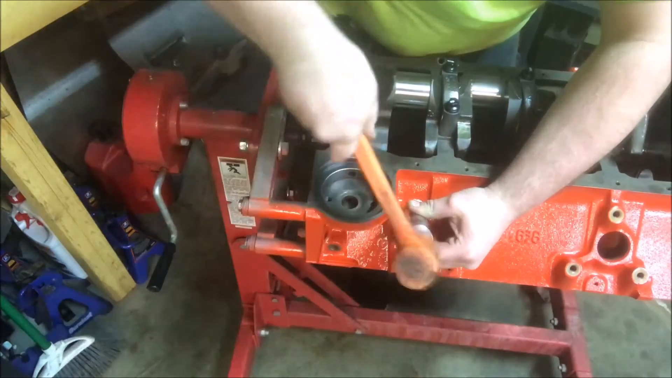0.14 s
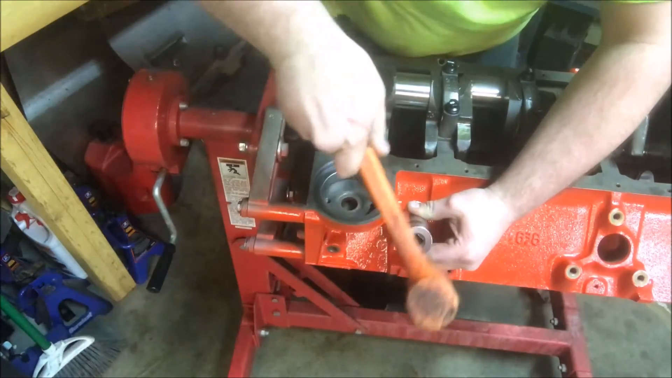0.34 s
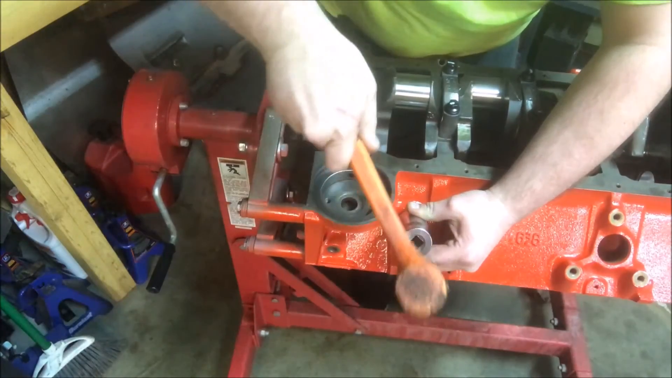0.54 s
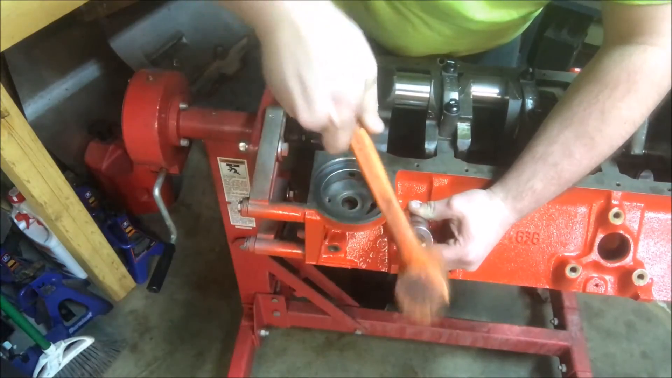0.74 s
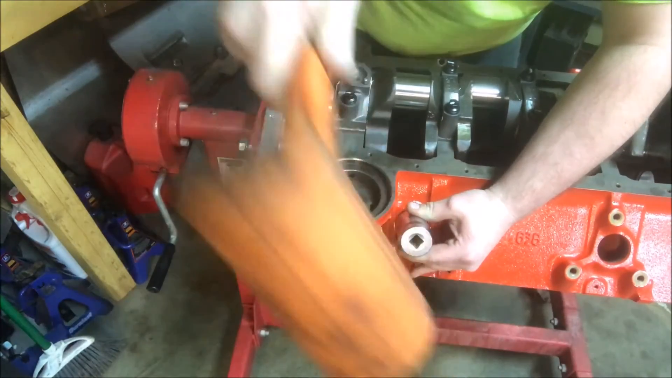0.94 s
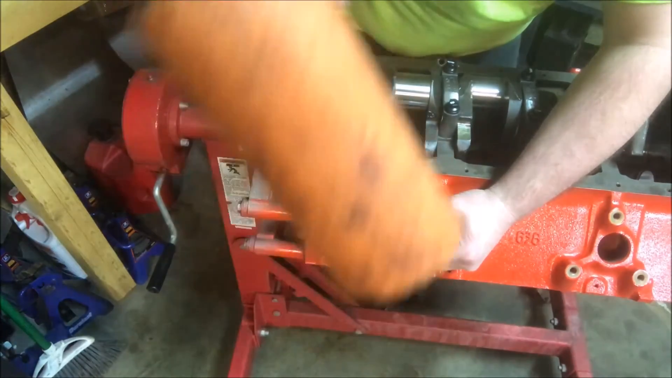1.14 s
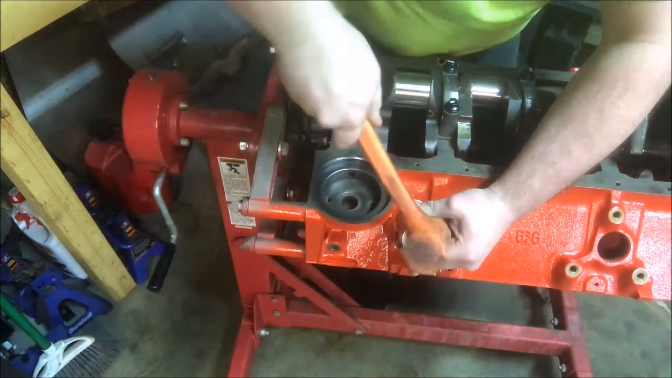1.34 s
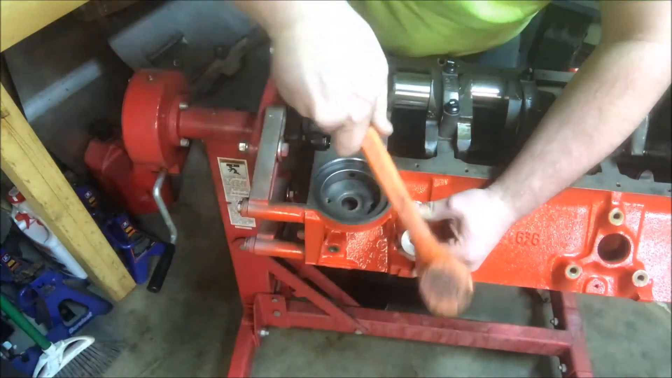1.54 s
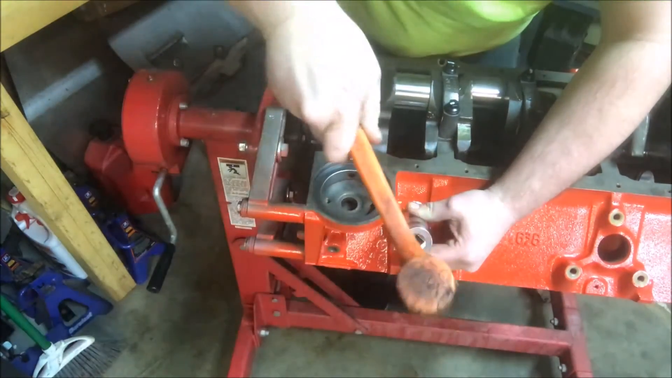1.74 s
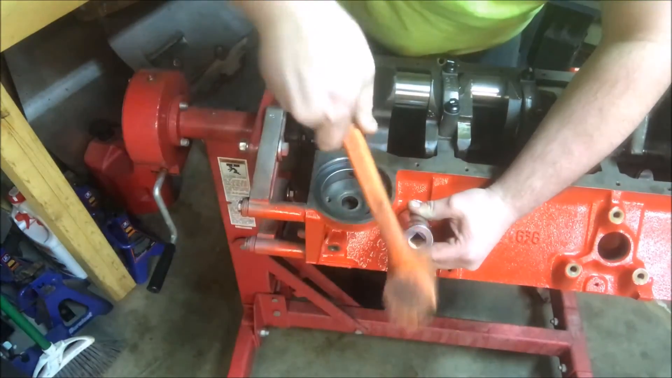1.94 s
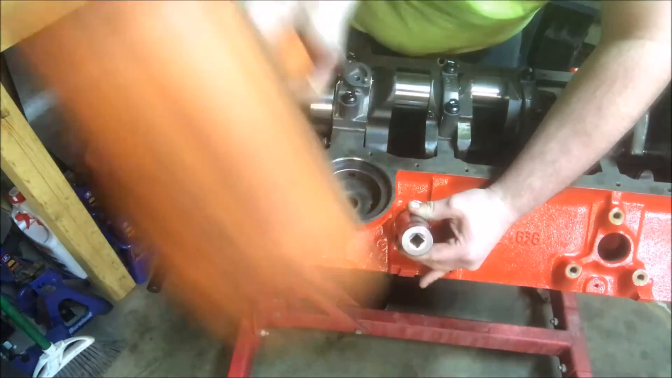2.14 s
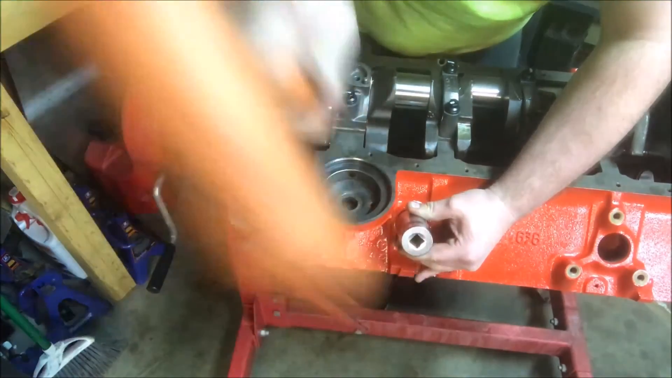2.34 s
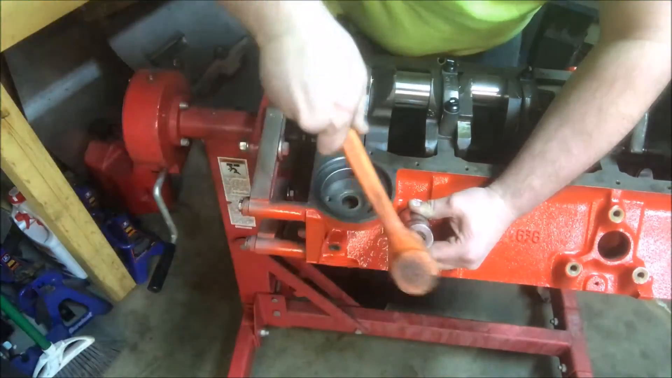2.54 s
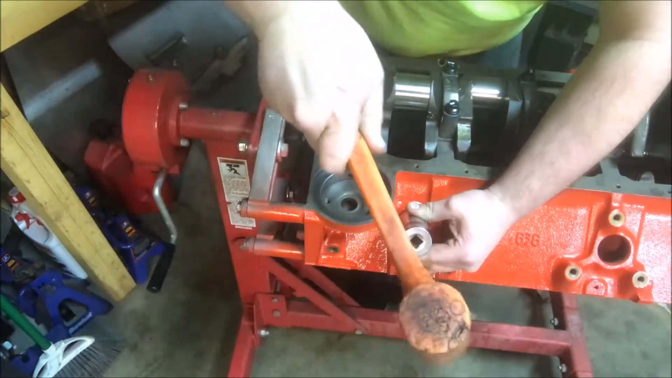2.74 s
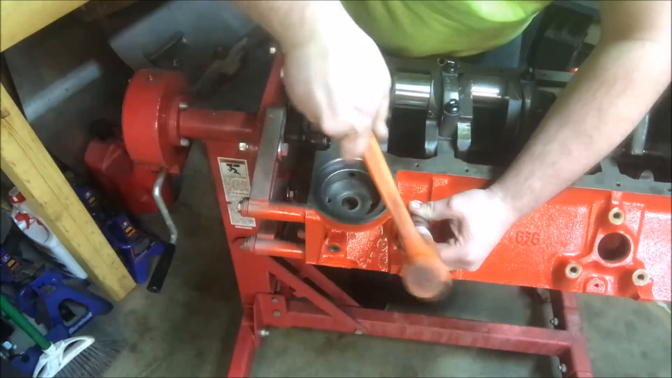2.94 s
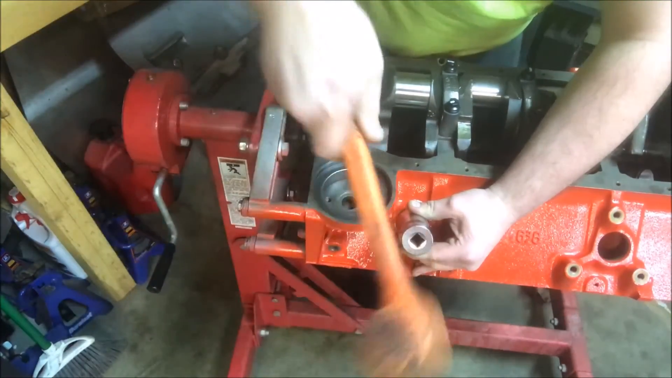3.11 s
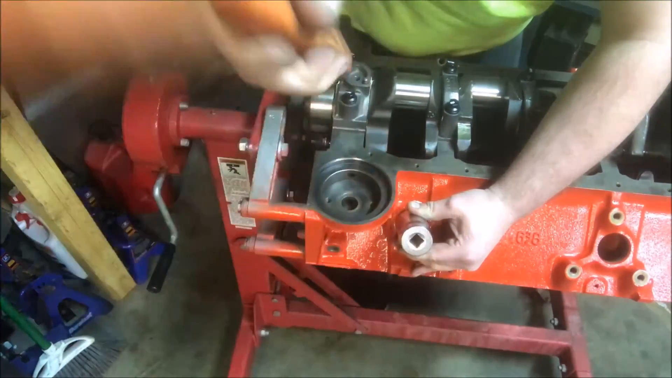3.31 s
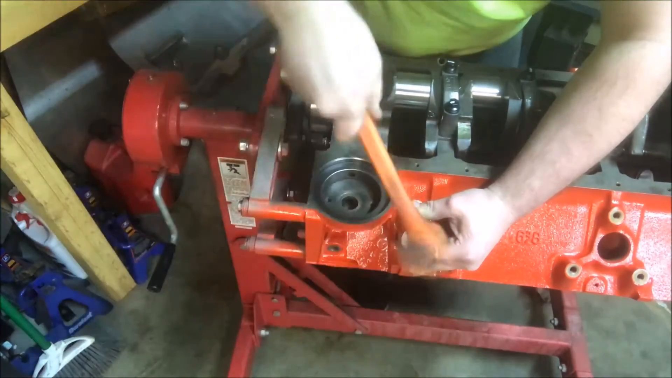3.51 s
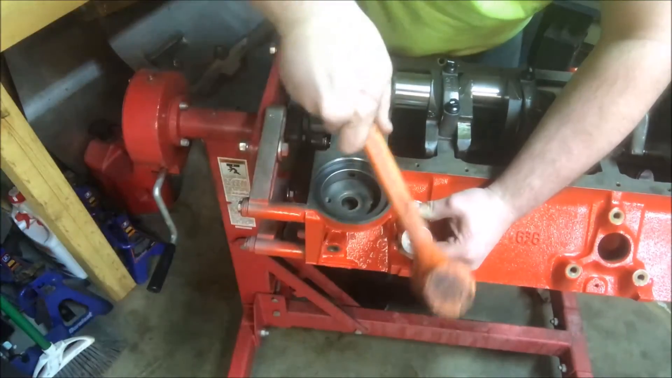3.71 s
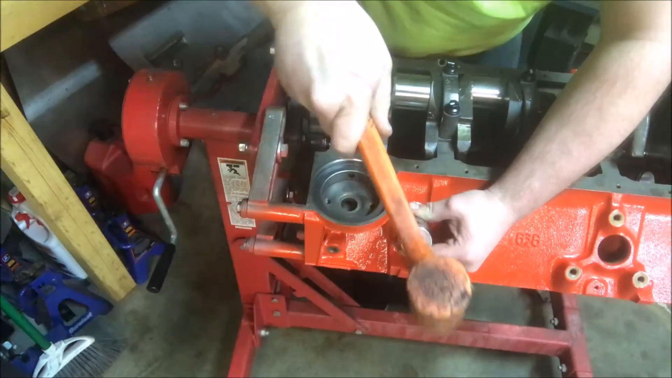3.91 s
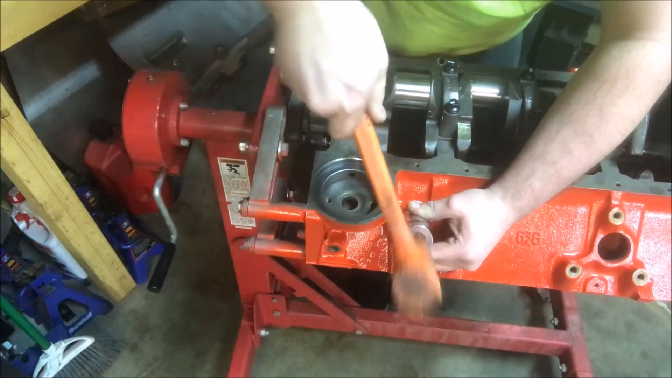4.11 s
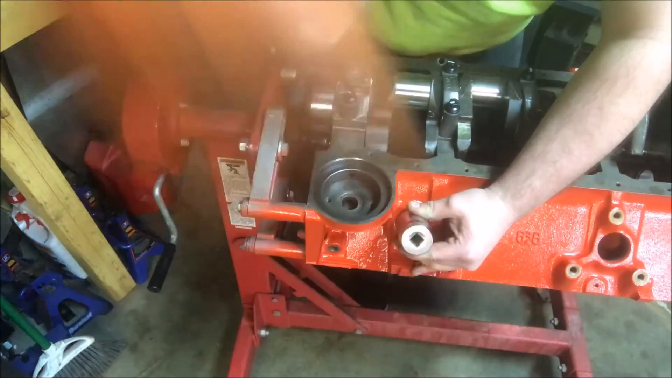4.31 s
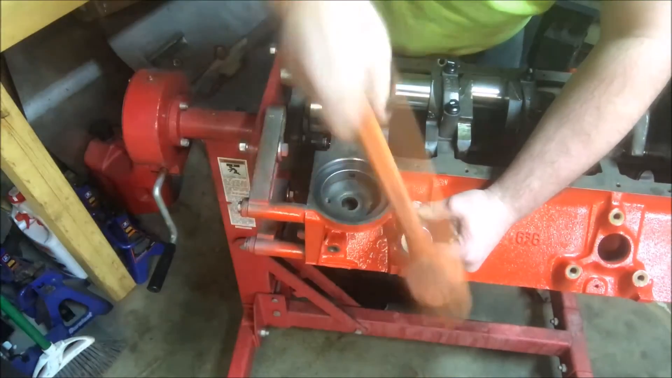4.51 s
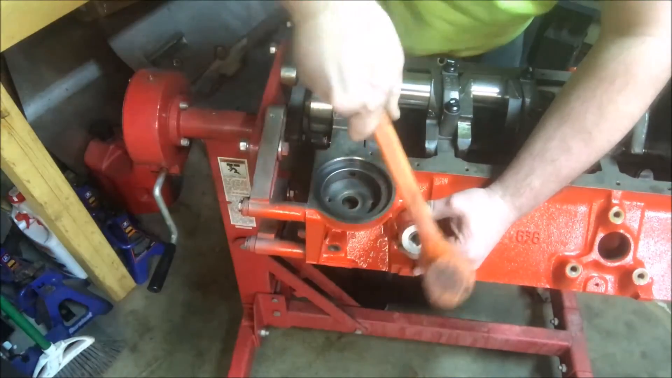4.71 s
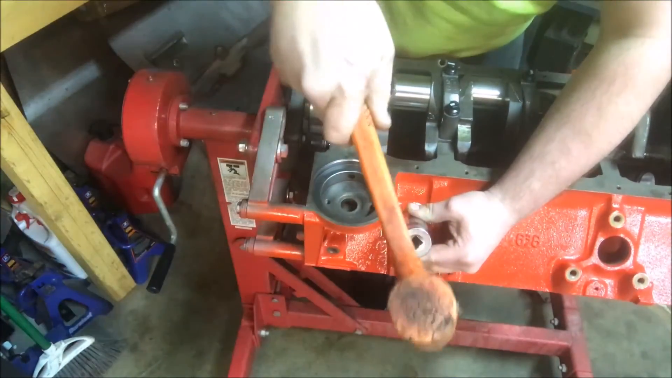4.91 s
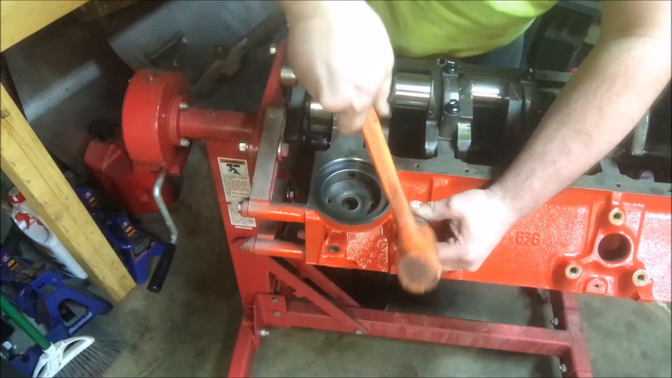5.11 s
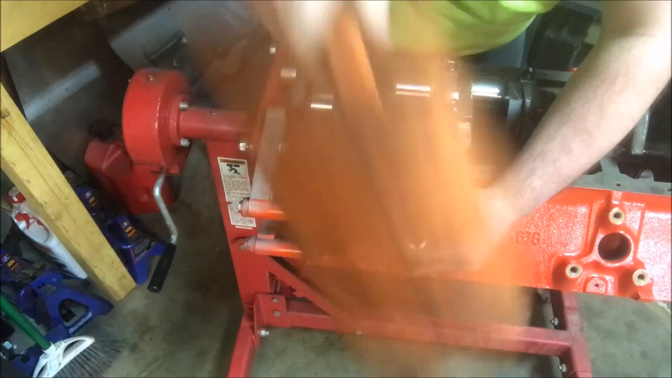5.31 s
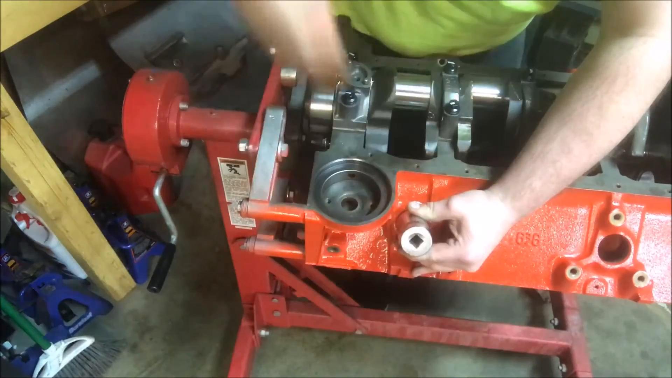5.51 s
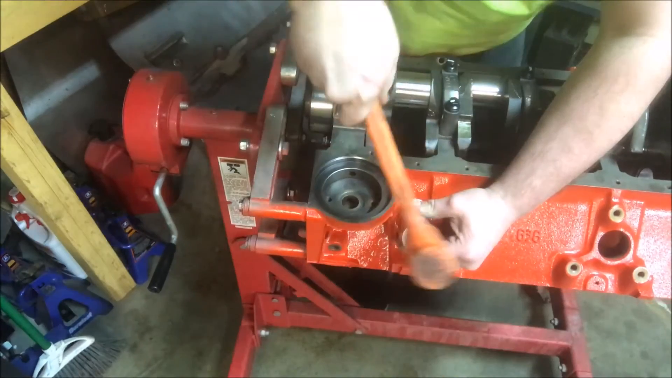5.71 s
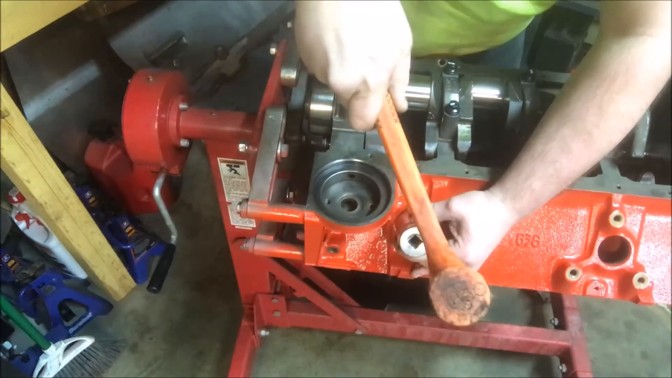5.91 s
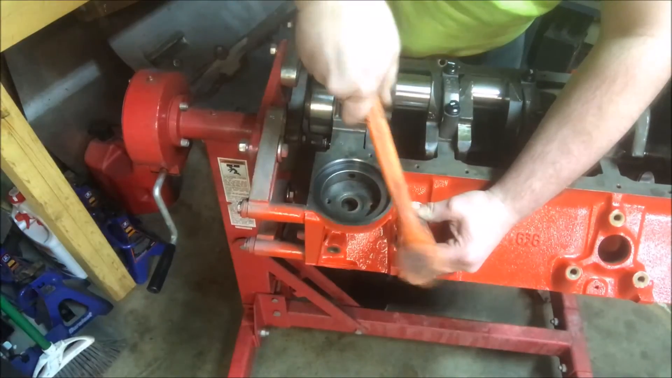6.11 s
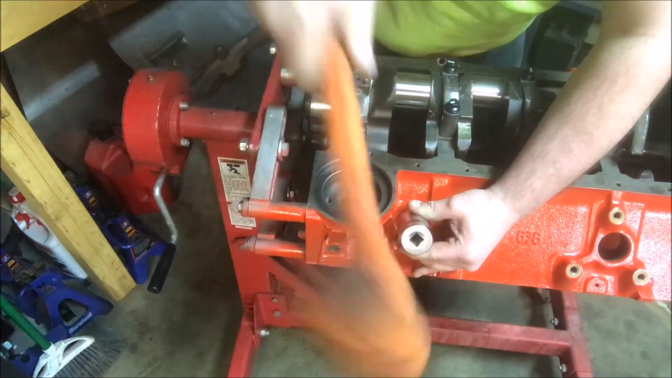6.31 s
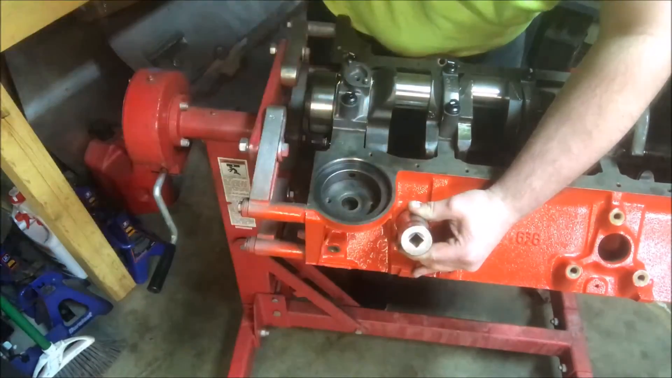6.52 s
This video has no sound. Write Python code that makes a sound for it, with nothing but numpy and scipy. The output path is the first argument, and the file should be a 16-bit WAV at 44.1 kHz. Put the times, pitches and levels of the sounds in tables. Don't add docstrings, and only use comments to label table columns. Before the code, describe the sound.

Close in a small workshop, a soft, shot-filled mallet strikes a steel socket held against an engine block. Twelve regular blows come roughly every half second, each a dull knock with a rattling, short metallic ring. Fuller square hits alternate with duller glancing ones. Tiny dry finger creaks, low puffs of air and steady hum fill the gaps, with a short room tail.

```python
import sys
import numpy as np
from scipy import signal
from scipy.fft import rfft, irfft
from scipy.io import wavfile
from scipy.ndimage import uniform_filter1d

SR = 44100
rng = np.random.default_rng(int(sys.argv[2]) if len(sys.argv) > 2 else 0)


def boost_factor(decibels):
    exponent = np.asarray(decibels, float) / 20
    return 10 ** exponent


def transcribe(u):
    v = np.clip(np.atleast_2d(u).T, -1, 1)
    q = np.round(v * 32767).astype(np.int16)
    wavfile.write(sys.argv[1], SR, q)


N = 293346
RING = int(.7 * SR)

# frequency in Hz, level in dB per Hz.
SHOP_HUM = [(35, -24.5), (60, -5.5), (212, -3), (354, 3.5), (593, -1), (1200, -1), (1660, -5.5), (2050, -5),
            (3850, -11.5), (10500, -24.5), (13900, -23), (16000, -28.5)]
# time in seconds, level in dB.
DRAUGHT_LEVEL = [(0.0, -66), (0.5, -61.5), (1.39, -68), (1.61, -59.5), (2.04, -59), (2.52, -69),
                 (2.76, -60), (2.89, -66), (3.65, -76), (3.8, -53), (4.08, -64.5), (4.54, -60.5),
                 (5.08, -65.5), (5.7, -56), (6.09, -69), (6.65, -57)]
# time in seconds, level in dB, length in seconds.
SWING_PUFFS = [
    (1.465, -39.5, 0.023),
    (3.652, -46.5, 0.028),
    (4.56, -48, .03),
    (4.677, -33.5, 0.01),
    (5.6, -57, 0.066),
    (5.751, -36, 0.019),
    (6.627, -58, 0.031),
]
# time in seconds, peak in dB.
CREAKS = [(.0194, -42.5), (.0346, -31), (.1498, -41), (.1622, -47), (1.044, -57.5), (1.1196, -43),
          (1.1378, -45.5), (1.2045, -45), (1.3685, -33), (1.3888, -45), (2.2139, -43), (2.3436, -52),
          (3.3344, -66), (3.354, -40), (3.4532, -42.5), (3.463, -58), (3.559, -51), (4.4067, -40.5),
          (4.418, -36), (4.4804, -48), (4.6242, -38.5), (5.4366, -44.5), (5.4436, -47), (5.4511, -35.5),
          (5.4616, -35), (5.686, -40), (5.6978, -32), (6.5141, -37), (6.5186, -42)]
# time in seconds, rub level in dB, length in seconds,
# level of the small creaks in dB.
GRIP_SHIFTS = [(0.024, -60, .015, -51.5), (0.136, -75.5, 0.02, -58.5), (0.196, -48, 0.031, -53),
               (1.137, -63.5, 0.026, -55), (1.2, -55, 0.01, -59), (1.366, -46, 0.015, -46.5),
               (1.388, -48, 0.011, -42), (2.23, -61, 0.033, -57), (2.322, -60, 0.038, -57.5),
               (3.36, -66, 0.034, -51.5), (3.46, -54, 0.017, -53.5), (4.415, -51, 0.014, -49),
               (4.518, -58.5, 0.054, -51), (4.62, -53, 0.028, -48.5), (5.167, -72, 0.025, -55.5),
               (5.457, -56.5, 0.024, -50.5), (5.691, -46, 0.019, -45.5), (6.215, -58.5, 0.016, -56.5),
               (6.524, -53, 0.019, -51.5)]
# frequency in Hz, level in dB per Hz.
SKIN_COLOUR = [(880, -39.5), (1500, -3.5), (2560, -2.5), (4200, 3), (4870, -8.5), (5660, 2.5),
               (10700, -11.5), (13500, -6), (16000, -4)]
# time in seconds, strength in dB, plug seat in dB,
# aim in dB from block wall (-) to bore (+), socket ring in dB.
BLOWS = [(.2505, 2.5, -5, 4.5, 0.5), (.7472, -3.5, -4.5, -6, 0.5), (1.452, 1, -3.5, 2.5, 3.5),
         (1.957, -1, -6.5, -1, -6), (2.565, 1.5, -3, 0.5, 0.5), (3.0839, -1.5, 5, 4, -2.5),
         (3.6376, 2.5, -4.5, 6, 1), (4.163, -0.5, -4.5, 0.5, 1.5), (4.6735, 0.5, -4, -2, 6),
         (5.2151, 1, -2.5, -3.5, 4), (5.7447, 1.5, -3, 3, 0.5), (6.2553, -1, 3, -2, -0.5)]
# blow number, level in dB under the blow.
FORE_SOUND = [
    (0, -29.5),
    (2, -29),
    (4, -28.5),
    (6, -28.5),
    (8, -26.5),
    (9, -37.5),
    (10, -27),
]
# blow number, delay in seconds, level in dB under the blow.
SOCKET_HOPS = [
    (7, .020, -5),
    (9, .007, -6),
    (4, .011, -9),
]
# frequency in Hz, level in dB, t60 in seconds.
METAL_MODES = [(749, -19, 0.13), (868.5, -17, 0.26), (892.7, -12.5, 0.23), (1143, -20, 0.13),
               (981, -16, 0.17), (1202, -13.5, 0.074), (1250, -5, 0.12), (1404, 6, 0.035),
               (1832, -10, 0.093), (1842, -25.5, 0.81), (1927, -7, 0.13), (1996, -13, 0.2),
               (2066, 0.5, 0.09), (2060, -30.5, 0.26), (2041, -1.5, 0.026), (2117, -12.5, 0.096),
               (2180, -9, 0.23), (2584, -13.5, 0.28), (2900, -3, 0.096), (2860, -14.5, .05),
               (3332, -8, 0.13), (3402, 1, 0.04), (3464, -9, 0.042), (3766, -16, 0.07), (4190, -16, 0.034),
               (4330, -15, 0.027), (4645, -10, .1), (4450, -15, 0.11), (5880, -20.5, 0.039),
               (14000, -33, 0.13)]
# frequency in Hz, level in dB, t60 in seconds.
STAND_MODES = [(41, -51, 1), (48.4, -52.5, 1.1), (128, -51.5, 1), (132, -51, 1.2), (166.3, -39.5, 0.8),
               (230, -33.5, 0.49), (374.5, -30, 0.36)]
# frequency in Hz, level in dB per Hz.
CLATTER = [(120, -33), (200, -3), (350, -4.5), (900, -7), (2050, -8), (3400, -10), (4600, -15), (5200, -23),
           (8300, -42), (11000, -37.5), (14000, -32), (16500, -30.5)]
# frequency in Hz, t60 in seconds.
CLATTER_T60 = [(200, 0.025), (1000, 0.096), (3000, 0.086), (8000, 0.27), (14000, 0.12)]
# frequency in Hz, drive in dB.
SQUARE_DRIVE = [(400, -2.5), (1300, 3), (2050, 1.8), (2900, -1), (3450, 5), (4600, 1), (7000, 4.7),
                (14000, -1)]
# frequency in Hz, change in dB.
GLANCE_LOSS = [(400, 0.1), (1300, -6), (2050, -3.5), (2900, -2.5), (3450, -5.5), (4600, -7.5), (7000, -7),
               (14000, -2.5)]
# frequency in Hz, t60 in seconds.
SHOP_T60 = [(150, 0.4), (700, 0.5), (2000, 0.51), (5000, 0.5), (9000, 0.48), (14000, 0.09)]
# time in seconds, lowest lost frequency in Hz, depth 0-1.
TREBLE_DROPOUTS = [(.502, 7500, .9), (.865, 6200, .9), (1.01, 4600, .9), (2.72, 6200, .95),
                   (3.68, 5000, .7), (3.787, 7600, .95), (4.36, 5800, .95), (4.705, 4900, .9),
                   (5.962, 4400, .9), (6.03, 5200, .95), (6.05, 6600, .95), (6.243, 4200, .95),
                   (6.455, 4200, .95), (6.54, 5000, .8)]
BAND_HZ = 120 * 2 ** np.arange(0, 7.2, .2)

HUM_DB = -51.5
SLIP_SCATTER, SLIP_SPREAD_DB = 1.6, 4.5
NUDGE_S, NUDGE_DB = .101, -44
FORE_LEAD_S = .0229
WANDER = .33
FREE_RING, FREE_S = .8, .013
SEAT_HZ, WALL_HZ, BORE_HZ, SOCKET_HZ, PART_OCTAVES = 1400, 2050, 2900, 3610, 0.18
WALL_PER_AIM, FACE_PER_AIM = -0.85, 0.32
FACE_DB, FACE_GLANCE_DB = 7, -2
THUD_DB, THUD_GLANCE_DB = -14.5, 3.5
TICK_DB, TICK_GLANCE_DB = -11, 0
DROPOUT_S = .011


def at_hz(points, hz):
    table = np.array(points)
    return np.interp(np.log(np.maximum(hz, 1)), np.log(table[:, 0]), table[:, 1])


def rms_one(x):
    return x / np.sqrt(np.mean(x ** 2) + 1e-20)


def shop_hum():
    colour = boost_factor(at_hz(SHOP_HUM, np.fft.rfftfreq(N, 1 / SR)))
    hum = irfft(rfft(rng.standard_normal(N)) * colour, N)
    return boost_factor(HUM_DB - 3.5) * rms_one(hum)


def swells(rows):
    t = np.arange(N) / SR
    return sum(boost_factor(db) * np.exp(-((t - at) / wide) ** 2) for at, db, wide in rows)


def draught():
    s, level_db = np.transpose(DRAUGHT_LEVEL)
    band = signal.butter(2, [34, 75], "band", fs=SR, output="sos")
    low = signal.sosfilt(band, rng.standard_normal(N))
    level = boost_factor(np.interp(np.arange(N) / SR, s, level_db)) + swells(SWING_PUFFS)
    return level * rms_one(low)


def fingers():
    source = swells(np.array(GRIP_SHIFTS)[:, :3]) * rng.standard_normal(N)
    creaks = list(CREAKS)
    for s, _, wide, small_db in GRIP_SHIFTS:
        for late, size in rng.standard_normal((6, 2)):
            at = abs(s + SLIP_SCATTER * wide * np.tanh(0.9 * late)) + 0.00072
            creaks.append((at, small_db - SLIP_SPREAD_DB * abs(size) + 6))
    for s, peak_db in creaks:
        slip = rng.standard_normal(24) * np.exp(-np.arange(24) / 7)
        start = round(s * SR) - 8
        source[start:start + 24] += boost_factor(peak_db + 2) * rms_one(slip)
    colour = boost_factor(at_hz(SKIN_COLOUR, np.fft.rfftfreq(N, 1 / SR)))
    return irfft(rfft(source) * rms_one(colour), N)


def modes(table, drive_db, spread_db, rise_s, damping, wander):
    hz, level_db, t60 = np.transpose(table)[:, :, None]
    t = np.arange(RING) / SR
    sign, chance = rng.standard_normal((2, len(table), 1))
    steps = np.cumsum(rng.standard_normal((len(table), RING // 64 + 1)), axis=1)
    slip = wander * uniform_filter1d(np.repeat(steps, 64, axis=1)[:, :RING], size=64)
    fall_db = -60 * damping * t / t60
    gain = np.sign(sign) * boost_factor(level_db + drive_db(hz) + spread_db * chance + fall_db)
    return (1 - np.exp(-t / rise_s)) * np.sum(gain * np.sin(2 * np.pi * hz * t + slip), axis=0)


def nudge():
    out = np.zeros(N)
    start = round(NUDGE_S * SR)
    out[start:start + RING] = boost_factor(NUDGE_DB) * modes(
        METAL_MODES[6:15], lambda hz: 0, spread_db=1.5, rise_s=.001, damping=1, wander=WANDER)
    return out


def push(hz, cycles, rise_s):
    t = np.arange(RING) / SR
    return -np.sin(2 * np.pi * hz * t) * np.exp(-t * hz / cycles) * (1 - np.exp(-(t / rise_s) ** 2))


def mallet_face(glancing):
    rise_s = .0006 + 0.0003 * glancing
    face = push(hz=1040, cycles=0.7 + 0.45 * glancing, rise_s=rise_s)
    thud = push(hz=372 - 70 * glancing, cycles=0.76, rise_s=rise_s)
    tick = push(hz=3000, cycles=1.2, rise_s=.0003) + boost_factor(-5) * push(hz=6400, cycles=3.5, rise_s=.0001)
    face += boost_factor(THUD_DB + THUD_GLANCE_DB * glancing) * thud
    return face + boost_factor(TICK_DB + TICK_GLANCE_DB * glancing) * tick


def shot(length_s, share):
    t = np.arange(1500) / SR
    drive = share * rng.standard_normal(len(t)) * np.exp(-(t / length_s) ** 2) / np.sqrt(length_s * SR)
    drive[0] = 1
    return drive / np.sqrt(np.sum(drive ** 2))


def evened(drive, hz):
    answer = np.abs(np.exp(-2j * np.pi * hz * np.arange(len(drive)) / SR) @ drive)[:, None]
    return -20 * np.log10(np.maximum(answer, .35))


def part(hz, centre_hz):
    return np.exp(-(np.log2(hz / centre_hz) / PART_OCTAVES) ** 2 / 2)


def noise_bands(size):
    white = rng.standard_normal((2, size))
    bands = []
    for k, hz in enumerate(BAND_HZ):
        band = signal.butter(2, [hz / 2 ** .1, hz * 2 ** .1], "band", fs=SR, output="sos")
        bands.append(signal.sosfilt(band, white[k % 2]))
    return np.array(bands)


def dying(decays, size):
    t60 = np.maximum(at_hz(decays, BAND_HZ), .01)[:, None]
    return boost_factor(-60 * np.arange(size) / SR / t60)


def struck_metal(drive_db, glancing, bands, fall):
    t = np.arange(RING) / SR
    short = fall.shape[1]
    shove = shot(.011 - 0.0013 * glancing, share=0.61)
    ring = modes(METAL_MODES, lambda hz: drive_db(hz) + evened(shove, hz), spread_db=1.5,
                 rise_s=0.0022, damping=1 + 0.55 * glancing, wander=WANDER)
    steel = boost_factor(-8.5) * signal.fftconvolve(ring, shove)[:RING]
    where = rng.integers(RING)
    clatter = bands[:, where:where + short] * fall ** (1 + 0.42 * glancing)
    steel[:short] += boost_factor(9.5 + at_hz(CLATTER, BAND_HZ) + drive_db(BAND_HZ)) @ clatter
    steel *= 1 - np.exp(-t / 0.002)
    steel += boost_factor(4.0) * signal.lfilter(*signal.iirpeak(13900, 11.0, fs=SR), steel)
    return steel * (1 + glancing * (FREE_RING * np.exp(-(t / FREE_S) ** 2) - .12))


def blows():
    out, fore = np.zeros(N + RING), dict(FORE_SOUND)
    bands, fall = noise_bands(size=RING * 2), dying(CLATTER_T60, size=RING // 3)
    no_bass = signal.butter(3, 215, "high", fs=SR, output="sos")
    for k, (s, strength_db, seat_db, aim_db, socket_db) in enumerate(BLOWS):
        glancing = k % 2

        def drive_db(hz):
            drive = at_hz(SQUARE_DRIVE, hz) + glancing * at_hz(GLANCE_LOSS, hz)
            drive = drive + seat_db * part(hz, SEAT_HZ) + socket_db * part(hz, SOCKET_HZ)
            return drive + aim_db * (part(hz, BORE_HZ) + WALL_PER_AIM * part(hz, WALL_HZ))

        steel = struck_metal(drive_db, glancing, bands, fall)
        for blow, delay_s, hop_db in SOCKET_HOPS:
            if blow == k:
                steel += boost_factor(hop_db) * np.r_[np.zeros(round(delay_s * SR)), steel][:RING]
        face_db = FACE_DB + FACE_GLANCE_DB * glancing + FACE_PER_AIM * aim_db
        hit = steel + boost_factor(face_db) * mallet_face(glancing)
        hit = boost_factor(strength_db) * signal.sosfilt(no_bass, hit)
        start = round(s * SR)
        out[start:start + RING] += hit
        if k in fore:
            lead = round(FORE_LEAD_S * SR)
            dulled = signal.lfilter([.4], [1, -.6], hit[:lead])
            out[start - lead:start] += boost_factor(fore[k] - 3) * dulled
    return out[:N]


def stand():
    out = np.zeros(N + RING)
    for s, strength_db, *_ in BLOWS:
        start = round(s * SR)
        out[start:start + RING] += boost_factor(0.6) * modes(
            STAND_MODES, lambda hz: strength_db, spread_db=2.0, rise_s=0.022, damping=1.0, wander=.02)
    return out[:N]


def workshop(x):
    gap = np.clip((np.arange(RING) / SR - .006) / 0.004, 0, 1)
    tail = gap * np.sum(noise_bands(size=RING) * dying(SHOP_T60, size=RING), axis=0)
    return signal.fftconvolve(x, tail / np.sqrt(np.sum(tail ** 2)))[:N]


def treble_dropouts(x):
    out, reach = x.copy(), 2048
    t = np.arange(-reach, reach) / SR
    for s, hz, depth in TREBLE_DROPOUTS:
        near = slice(round(s * SR) - reach, round(s * SR) + reach)
        highs = signal.butter(8, hz, "high", fs=SR, output="sos")
        treble = signal.sosfiltfilt(highs, out[:, near])
        out[:, near] -= depth * np.exp(-(t / DROPOUT_S) ** 6) * treble
    return out


def scene():
    hand = fingers()
    taps = nudge() + blows()
    room = workshop(boost_factor(-13.5) * taps + boost_factor(-16.5) * hand)
    return (shop_hum() + draught() + hand + taps + stand() + room)[None, :]


def top_cut(x):
    return signal.sosfilt(signal.butter(12, 16640, fs=SR, output="sos"), x)


def record(dry):
    shaved = np.tanh(dry) - dry
    held = dry + signal.sosfilt(signal.butter(2, 150, "high", fs=SR, output="sos"), shaved)
    held = signal.sosfilt(signal.cheby2(10, 60, 16750, fs=SR, output="sos"), held)
    return top_cut(0.9 * treble_dropouts(held))


dry = scene()
out = record(dry)
transcribe(out)
```